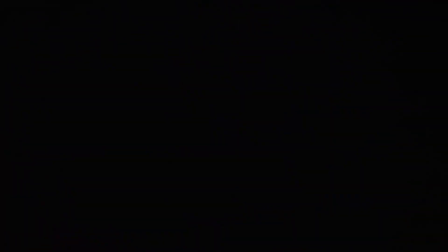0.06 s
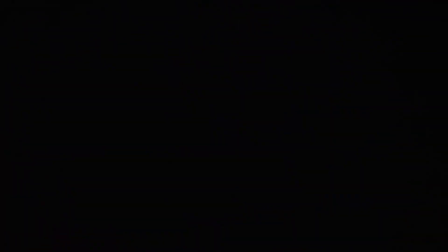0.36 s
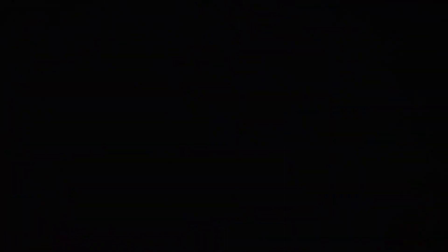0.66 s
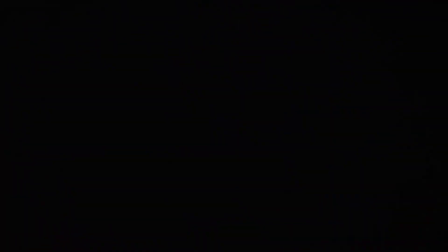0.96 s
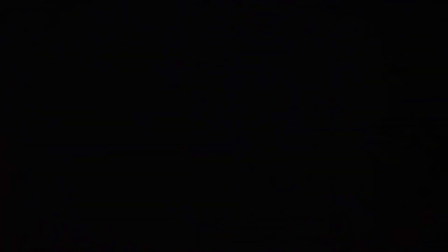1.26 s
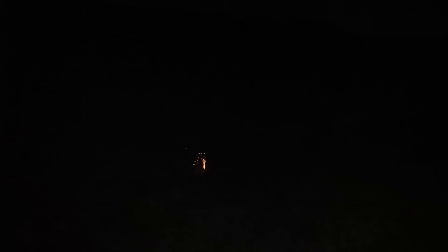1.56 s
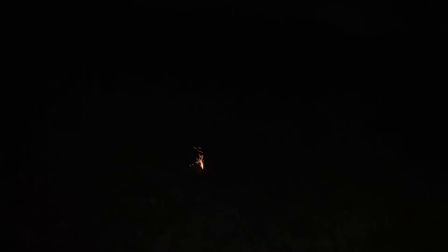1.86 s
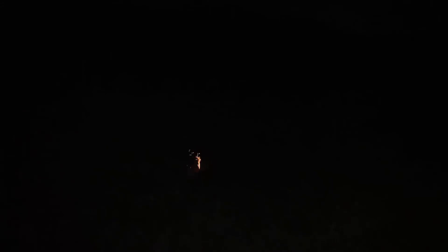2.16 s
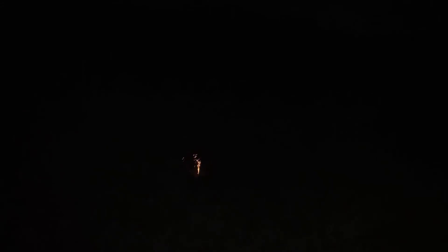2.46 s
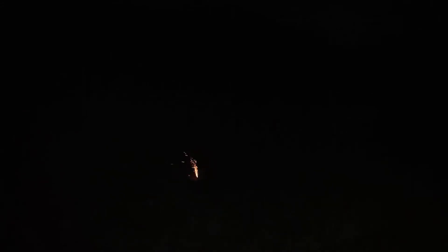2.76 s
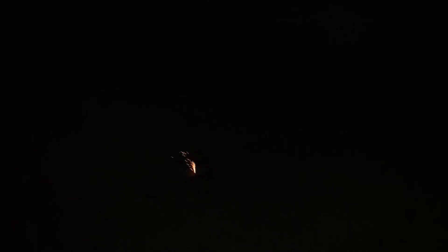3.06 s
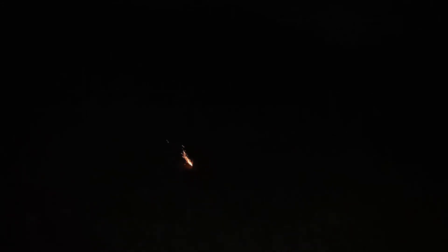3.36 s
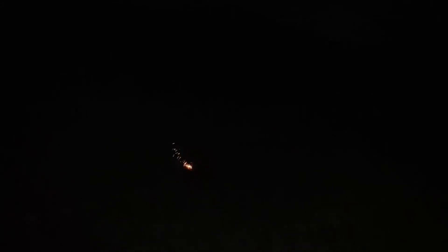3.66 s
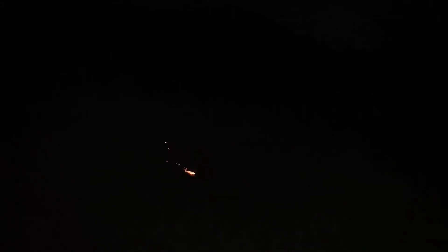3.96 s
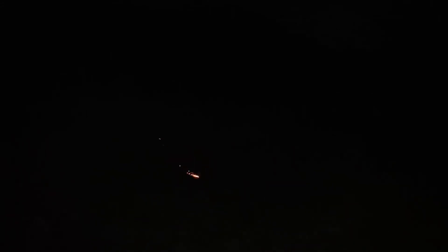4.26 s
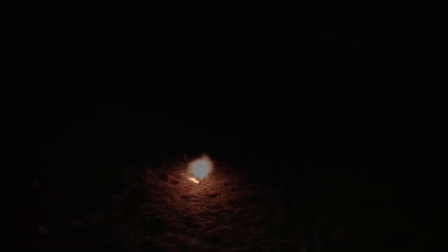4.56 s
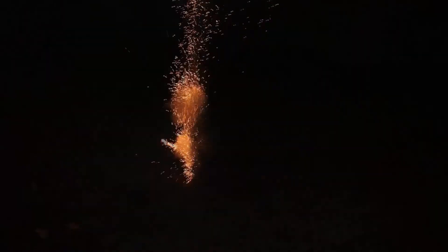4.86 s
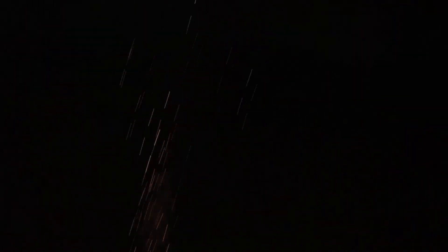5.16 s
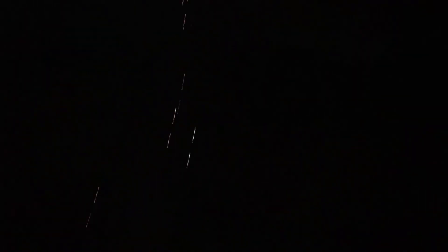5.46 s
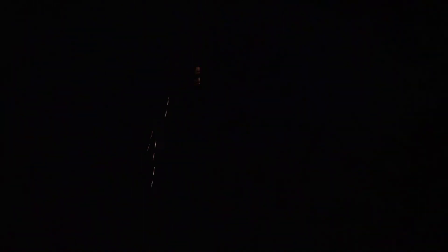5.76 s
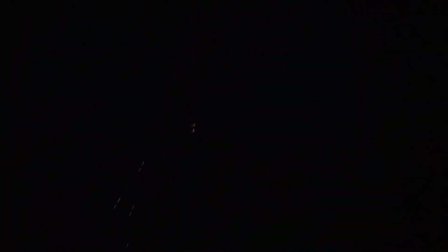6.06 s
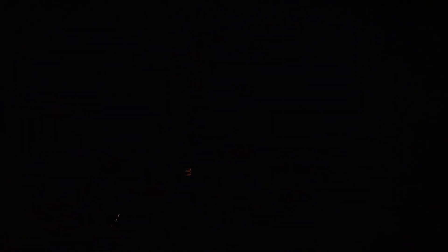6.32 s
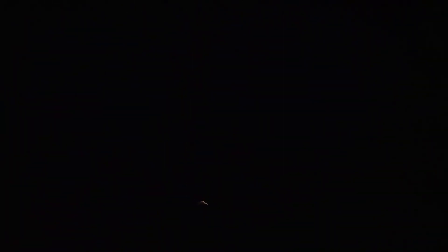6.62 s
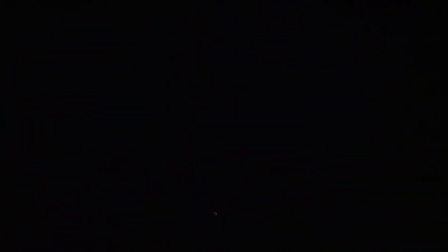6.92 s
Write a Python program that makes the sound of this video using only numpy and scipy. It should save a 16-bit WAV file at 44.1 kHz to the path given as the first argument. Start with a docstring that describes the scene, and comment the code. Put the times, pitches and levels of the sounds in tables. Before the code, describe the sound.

Outdoors at night, a distant volley of fireworks pops dully and fades to a faint crackle, with one sharp click nearby. After an abrupt cut, a close fuse hisses, sputters and snaps over faint traffic. The firework launches with a loud blast that briefly overloads the microphone. A jet of sparks rushes upward while the bang rolls back from the surroundings and dies away.

```python
"""A firework launches close by on a lawn at night. First a far-off volley crackles and dies away;
after a cut, the fuse hisses and spits. The lift charge overloads the microphone and the sound
drops out for an instant. Then a jet of sparks rushes from the tube and the bang rolls back
from trees and houses, over a murmur of distant traffic."""
import sys
import numpy as np
from scipy import signal
from scipy.fft import rfft, irfft, next_fast_len
from scipy.io import wavfile
from scipy.ndimage import map_coordinates

SR = 44100
rng = np.random.default_rng(int(sys.argv[2]) if len(sys.argv) > 2 else 0)


def output_pcm(signal):
    """Save a mono or channel-first signal as 16-bit PCM at the path in sys.argv[1].

    Samples are clipped to [-1, 1] before scaling.
    """
    pcm = np.clip(np.atleast_2d(signal).T, -1, 1) * 32767
    wavfile.write(sys.argv[1], SR, np.round(pcm).astype(np.int16))


N = 308259
T = np.arange(N) / SR
CUT_S, RESUME_S = 1.531, 1.5635  # gap between the far volley and the close firework
OVERLOAD_S, RECOVER_S = 4.5655, 4.629  # dropout after the blast


def amp(db):
    """Decibels to gain."""
    return 10 ** (np.asarray(db) / 20)


def unit(x):
    """Scale to rms 1."""
    return x / np.sqrt(np.mean(x ** 2) + 1e-20)


def along(points, hz):
    """Read (Hz, value) breakpoints on a log frequency axis."""
    freqs, values = np.transpose(points)
    return np.interp(np.log(hz + 1), np.log(freqs + 1), values)


def colour(points, hz):
    """Gain of an EQ curve that rolls off 24 dB an octave beyond its ends."""
    octaves_below = np.maximum(np.log2(points[0][0] / (hz + 1)), 0)
    octaves_above = np.maximum(np.log2((hz + 1) / points[-1][0]), 0)
    return amp(along(points, hz) - 24 * (octaves_below + octaves_above))


def since(s):
    """Seconds since time s, zero before it."""
    return np.maximum(T - s, 0)


def ramp(s, length_s):
    """Fade from 0 to 1, starting at time s."""
    return np.minimum(since(s) / length_s, 1)


def receding(s, doubling_s, loss_db_per_s):
    """Level in dB of a sound moving away from time s on: 1 / distance, and a steady loss."""
    return -20 * np.log10(1 + since(s) / doubling_s) - loss_db_per_s * since(s)


def swells(rows):
    """Bell-shaped swells and dips in dB, one curve for each level column."""
    return sum(np.outer(dbs, np.exp(-((T - s) / width) ** 2)) for s, width, *dbs in rows)


def wobble(rate):
    """Smooth random modulation, rate knots a second."""
    return map_coordinates(rng.standard_normal(int(N * rate / SR) + 4), [T * rate])


def filtered(x, response):
    """EQ x with a gain given as a function of frequency."""
    n_fft = next_fast_len(N + SR // 4, True)
    return irfft(rfft(x, n_fft) * response(np.fft.rfftfreq(n_fft, 1 / SR)), n_fft)[..., :N]


def sides(db):
    """Pan gains that put the left channel db above the right."""
    return amp(np.array([[.5], [-.5]]) * db)


def left_lag(hz, lag_ms):
    """Phase ramps that put the left channel lag_ms behind the right."""
    return np.exp(np.array([[-1j], [1j]]) * np.pi * hz * lag_ms / 1000)


def rush(spectrum, correlation, pan=((1000, 0),), grainy=0, rate=100, lag_ms=0):
    """Stereo noise of rms 1; the share grainy of its power comes as clicks, rate a second."""
    hits = np.flatnonzero(rng.random(N) < rate / SR)
    size = rng.choice([-1, 1], N)[hits] * rng.uniform(.5, 1, N)[hits]
    bearing = rng.uniform(-1, 1, N)[hits]
    grains = np.zeros((2, N))
    grains[:, hits] = size, np.sqrt(3) * size * bearing
    texture = np.sqrt(1 - grainy) * rng.standard_normal((2, N)) + np.sqrt(grainy) * unit(grains)
    n_fft = next_fast_len(N + SR // 4, True)
    hz = np.fft.rfftfreq(n_fft, 1 / SR)
    width = np.arccos(np.clip(along(correlation, hz), -1, 1)) / 2
    mid, side = rfft(texture, n_fft) * colour(spectrum, hz) * [np.cos(width), np.sin(width)]
    stereo = np.array([mid + side, mid - side]) * sides(along(pan, hz)) * left_lag(hz, lag_ms)
    return unit(irfft(stereo, n_fft)[:, :N])


def report(spectrum, scatter, t60, lag_ms=0, size=4096):
    """A stereo pressure pulse of peak 1 with a short scattered tail."""
    hz, t = np.fft.rfftfreq(size, 1 / SR), np.arange(size) / SR
    # minimum-phase EQ: the ringing follows the attack
    cepstrum = irfft(np.log(np.maximum(colour(spectrum, hz), 1e-5)))
    cepstrum[1:size // 2] *= 2
    cepstrum[size // 2 + 1:] = 0
    tail = rng.standard_normal((2, size)) * amp(-60 * t / t60)
    push = signal.unit_impulse(size, 16) + scatter * tail / np.linalg.norm(tail[0])
    pulse = irfft(rfft(push) * np.exp(rfft(cepstrum)) * left_lag(hz, lag_ms))
    return pulse / np.abs(pulse).max()


def add(track, s, sound):
    """Mix a sound in at time s."""
    part = track[:, max(round(s * SR), 0):][:, :sound.shape[-1]]
    part += sound[..., :part.shape[-1]]


# Pops that stand out of the volley: t/s, peak/dB
POP_CUES = [(.0167, -19), (.031, -14), (.0527, -10.5), (.0584, -15), (.0867, -12.5), (.1117, -16.5),
            (.1807, -14.5), (.2137, -15), (.2387, -16), (.2547, -14), (.3037, -12), (.3197, -19),
            (.3387, -23), (.3807, -16.5), (.4657, -18.5), (.5107, -20), (.5697, -16.5), (.6187, -24),
            (1.4027, -8.5), (1.4092, -23), (1.4417, -21), (1.4597, -20)]
# Tone of one pop, the crackle bed and the night air: f/Hz, level/dB
POP_EQ = [(150, -19), (280, -21.5), (400, -5), (560, 2.5), (820, -1), (1100, -14), (2000, -20.5),
          (3500, -32), (6000, -49)]
CRACKLE_EQ = [(88, -45), (150, -22), (456, -4), (540, -3.5), (807, 1.5), (1170, -6), (1800, -10),
              (3190, -19.5), (3660, -20.5), (6000, -32.5), (7800, -58)]
AIR_EQ = [(25, -15), (55, -5), (90, -0.5), (140, -7), (200, -4.5), (600, -8.5), (2000, -16), (5000, -20.5),
          (10000, -20.5), (15500, -26.5)]
# Stereo image of crackle and air: f/Hz, L-R correlation
FAR_IMAGE = [(60, 0.84), (700, 0.96), (2000, 0.87), (5000, 0.15), (10000, 0.086)]


def far_volley(start_db=-27, floor_db=-34.5, release_s=0.63):
    """Hundreds of small reports, dulled by distance, sag and then fade fast to a steady crackle."""
    level_db = np.maximum(start_db - 6 * T - 35 * since(release_s), floor_db)
    out = amp(level_db) * rush(CRACKLE_EQ, FAR_IMAGE, grainy=0.2, rate=300, lag_ms=0.14)
    for s, db in POP_CUES:
        add(out, s, amp(db) * report(POP_EQ, scatter=0.59, t60=0.063, lag_ms=0.12))
    return out + amp(-42.5) * rush(AIR_EQ, FAR_IMAGE)


# Bright, dry tone of the tick: f/Hz, level/dB
TICK_EQ = [(400, -5), (1400, 0), (2000, -5), (2550, -18), (3100, -7), (3800, -2), (4600, -19), (6500, -14),
           (7800, -7.5), (10000, -10), (11500, -15), (15500, -14)]


def tick(at_s=1.2572, peak_db=-3.5):
    """A small hard thing clicks once, close by."""
    out = np.zeros((2, N))
    add(out, at_s, amp(peak_db) * report(TICK_EQ, scatter=.45, t60=.008))
    return out


# Low murmur of the roads: f/Hz, level/dB
TRAFFIC_EQ = [(20, -3.5), (40, -0.5), (70, -4), (130, -3), (250, -1.5), (450, 2), (700, -2.5),
              (1100, -11.5), (2000, -17), (5000, -23), (8800, -23)]


def traffic(before_db=-37.5, after_db=-39.5):
    """A bed of distant traffic, a little quieter after the launch."""
    level_db = np.where(T < OVERLOAD_S, before_db, after_db) + 0.8 * wobble(6)
    image = [(40, 0.77), (200, 0.82), (500, 0.65), (1200, 0.2), (4000, .15)]
    return amp(level_db) * rush(TRAFFIC_EQ, image, pan=[(100, -1.2), (1000, -.5)])


# The powder flares or falters: t/s, half width/s, hiss/dB, whistle/dB
FUSE_SWELLS = [(1.73, 0.14, 1, 4), (1.95, 0.065, -3.5, -1.5), (3.2, 0.053, 4, 3), (3.35, 0.088, 3.5, 3)]
# Tone of the powder's hiss and the gas whistle: f/Hz, level/dB
FUSE_EQ = [(300, -7), (900, 3), (1700, 0), (2600, 1.5), (4100, 1), (5200, 3), (6400, -3.5), (7100, 1.5),
           (8200, -2.5), (8800, -12)]
WHISTLE_EQ = [(4400, -21), (4750, -7.5), (5100, -4), (5400, -1), (5850, -9), (6350, -2.5), (6900, -12.5),
              (8200, -25.5)]
# Stereo image of both: f/Hz, L-R correlation
FUSE_IMAGE = [(60, 0.75), (120, 0.67), (240, 0.75), (490, 0.56), (1000, 0.78), (2020, 0.82), (4070, 0.25),
              (8230, 1)]
# Notches where the ground bounce cancels the hiss: f/Hz, half width/Hz, left/dB, right/dB
GROUND_NOTCHES = [(2010, 100, 0.5, -7.5), (4640, 170, -8, -6), (4480, 150, 1.5, -12), (6320, 220, -3.5, -7)]
# Dulling once the flame is down: f/Hz, gain/dB
SUNK_EQ = [(1000, -1.5), (5500, -1), (8000, -5)]


def fuse(hiss_db=-37.5, whistle_db=-39.5, sink_at_s=3.03, notch_climb=1.06):
    """Burning powder fizzes and sputters; gas leaving the fuse's end adds a breathy whistle."""
    def ground(hz):
        return amp(sum(np.array([[left], [right]]) * np.exp(-((hz - f) / width) ** 2)
                       for f, width, left, right in GROUND_NOTCHES))

    hiss_swell_db, whistle_swell_db = swells(FUSE_SWELLS)
    sputter = amp(0.92 * wobble(45) + 0.6 * wobble(7.1))
    hiss_pan = [(1500, -3), (3200, -3.0), (4400, 0.5), (7000, 2.0)]
    hiss = rush(FUSE_EQ, FUSE_IMAGE, hiss_pan, grainy=0.2, rate=900, lag_ms=-0.018)
    whistle = rush(WHISTLE_EQ, FUSE_IMAGE, pan=[(5000, 9.4)], lag_ms=-0.013)
    burn = amp(hiss_db + hiss_swell_db) * hiss + amp(whistle_db + whistle_swell_db) * whistle
    # the flame sinks towards the ground: crossfade to a duller tone with higher notches
    sunk = ramp(sink_at_s, length_s=1)
    raised = filtered(burn, ground)
    lowered = filtered(burn, lambda hz: ground(hz / notch_climb) * amp(along(SUNK_EQ, hz)))
    return ((1 - sunk) * raised + sunk * lowered) * sputter * (T < OVERLOAD_S)


# Spitting sparks: t/s, crack/dB, puff/dB, crack tilt/(dB per octave), crack pan L-R/dB
SNAP_CUES = [(2.106, -19, -38, -6.5, 1), (2.96, -6.5, -24.5, 1.5, -12.5), (2.994, -19, -37.5, 0, -6),
             (3.033, -35.5, -25, -4, 1), (3.105, -37.5, -27, -4, -3), (4.2835, -15.5, -21, -1.5, -11)]
# Tone of the crack before its tilt: f/Hz, level/dB
CRACK_EQ = [(300, -8), (900, -6.5), (1450, -0.5), (2000, -10), (2600, -20), (3500, -15), (4300, -7.5),
            (4800, 0), (5300, -8), (5900, -16), (7000, -19), (8800, -33)]


def snaps(puff_delay_s=.0022):
    """Sparks go off with a sharp crack and a small, low puff."""
    out = np.zeros((2, N))
    puff_eq = [(120, -8.0), (240, 3.5), (700, -16.0)]
    for s, crack_db, puff_db, tilt, pan_db in SNAP_CUES:
        tilted_eq = [(hz, db + tilt * np.log2(hz / 1000)) for hz, db in CRACK_EQ]
        add(out, s, amp(crack_db) * sides(pan_db) * report(tilted_eq, scatter=0.56, t60=0.017))
        add(out, s + puff_delay_s, amp(puff_db) * report(puff_eq, scatter=0.53, t60=0.043))
    return out


# Pressure surges in the tube: t/s, level/dB
SURGE_CUES = [(4.532, -13.5), (4.542, -9), (4.5521, -1.5)]
# Broadband tone of the blast: f/Hz, level/dB
BLAST_EQ = [(60, -12), (280, -9.5), (560, -7.5), (1000, -2.5), (1750, -4.5), (2250, -9.5), (2650, -3),
            (3800, -12.5), (5000, -6.5), (6100, -5), (7200, -12), (8700, -22)]


def lift_charge(catch_at_s=4.452, catch_db=-33.5, attack_s=0.0036, decay_db_per_s=501):
    """The charge fizzes as it catches, then goes off in three fast, growing surges."""
    catch = amp(catch_db) * ramp(catch_at_s, length_s=.03)
    surges = sum(amp(db - decay_db_per_s * since(s)) * ramp(s, attack_s) for s, db in SURGE_CUES)
    image = [(200, 0.82), (1200, 0.91), (3000, 0.73), (8000, .6)]
    pan = [(700, -0.5), (1500, 2.5), (3000, -5), (4500, 2.5), (6000, 9.5), (8500, -3)]
    return (catch + surges) * rush(BLAST_EQ, image, pan) * (T < RECOVER_S)


# Spark clusters flare in flight: t/s, half width/s, hiss/dB, sizzle/dB
JET_SWELLS = [(4.95, 0.11, 4.5, 4), (5.23, 0.095, 3, 0.5), (5.48, 0.094, 3.1, 4), (5.95, 0.069, 0.5, 9.5),
              (6.3, 0.091, 3, -2)]
# Flight path: t/s, share of the hiss power heard from high on the right
JET_PATH = [(4.65, 0.091), (4.95, 0.98), (5.4, 0.55), (5.7, .05)]
# Tone of the jet's hiss and its fine top sizzle: f/Hz, level/dB
JET_EQ = [(700, -19), (1800, 0), (2700, -0.5), (3700, -2), (5200, -1.5), (6200, -7), (7200, -15),
          (8500, -31)]
SIZZLE_EQ = [(4500, -18), (5600, -1), (6400, -4), (7300, -7.5), (8000, -12), (8800, -14.5)]
# Tone shift as the sparks turn over and fall: f/Hz, gain/dB
FALLING_EQ = [(1500, -2.5), (2900, 2.5), (4500, -1.5), (6500, 1.5)]
# Pan of the jet: f/Hz, L-R/dB
JET_BALANCE = [(530, -7), (920, -6), (1600, 5), (2760, -2.5), (4760, 6), (8230, 2.5)]
# Wide image of the sparks overhead: f/Hz, L-R correlation
JET_IMAGE = [(1000, 0.28), (3000, 0.31), (8000, 0.46)]


def spark_jet(leaves_s=4.744, doubling_s=0.061, fall_at_s=5.5):
    """Burning grains stream from the tube, pass overhead and fall back; the sizzle fades first."""
    hiss_swell_db, sizzle_swell_db = swells(JET_SWELLS)
    hiss_db = -15 + receding(leaves_s, doubling_s, loss_db_per_s=-0.1) + hiss_swell_db
    sizzle_db = -18 + receding(leaves_s, doubling_s, loss_db_per_s=7.5) + sizzle_swell_db
    overhead = np.interp(T, *np.transpose(JET_PATH))
    ahead_image = [(1000, 1.0), (3000, 0.39), (8000, 0.25)]
    ahead = rush(JET_EQ, ahead_image, JET_BALANCE, grainy=0.11, rate=1400)
    above = rush(JET_EQ, JET_IMAGE, JET_BALANCE, grainy=0.29, rate=770, lag_ms=0.2)
    hiss = amp(hiss_db) * (np.sqrt(1 - overhead) * ahead + np.sqrt(overhead) * above)
    fallen = ramp(fall_at_s, length_s=.6)
    hiss = (1 - fallen) * hiss + filtered(fallen * hiss, lambda hz: amp(along(FALLING_EQ, hz)))
    sizzle = amp(sizzle_db) * rush(SIZZLE_EQ, JET_IMAGE, JET_BALANCE, grainy=0.092, rate=2300, lag_ms=.15)
    flutter = amp(0.59 * wobble(40))
    return (hiss + sizzle) * flutter * (T > OVERLOAD_S)


def roll_envelope(level_db, drift_db, doubling_s, loss_db_per_s, flutter_db, build_db_per_s=0):
    """Gain of one echo layer: it holds while near trees and houses answer, then recedes."""
    full_at_s, hold_s = 4.697, 0.5
    build_db = -build_db_per_s * np.maximum(full_at_s - T, 0)
    hold_db = drift_db * ramp(full_at_s, hold_s)
    release_db = receding(full_at_s + hold_s, doubling_s, loss_db_per_s)
    return amp(level_db + build_db + hold_db + release_db + flutter_db * wobble(30)) * (T > OVERLOAD_S)


# Waves and lulls in the echo: t/s, half width/s, thud/dB, boom/dB, clatter/dB
ROLL_SWELLS = [(4.745, .035, 4.5, 0.5, 1.5), (4.89, 0.054, -1, -2.5, -2.5), (5.28, 0.037, -3, 0, 0.5)]
# Bass, body and midrange layers of the roll: f/Hz, level/dB
THUD_EQ = [(55, -14.5), (85, -8.5), (110, 0), (140, -3.5)]
BOOM_EQ = [(60, -25), (110, -17), (150, -2.5), (190, 1), (300, 0), (400, -3), (570, -3.5), (700, -14)]
CLATTER_EQ = [(300, -20), (550, -3), (1000, -1), (1700, -1.5), (2300, -7.5), (3500, -12.5)]
# Stereo image of all three: f/Hz, L-R correlation
ROLL_IMAGE = [(60, 0.83), (140, 0.98), (310, 1), (700, 0.86), (1600, 0.67), (3500, 0.4)]
# Single hard slapbacks: t/s, peak/dB
SLAP_CUES = [(4.724, -7), (4.838, -10.5), (4.9617, -5), (4.9995, -6.5), (5.0503, -6.5), (5.1185, -7),
             (5.2086, -1.5), (5.3375, -9), (5.432, -12), (5.661, -21), (5.768, -23), (5.817, -23),
             (5.908, -20.5), (6.002, -26), (6.071, -27)]
# Dark tone of a slapback: f/Hz, level/dB
SLAP_EQ = [(60, -24), (130, -1.5), (300, 1), (600, -11), (1600, -18), (4000, -23.5), (8000, -41)]


def rolling_echo():
    """Countless reflections of the bang merge into a roll; broad walls send back single slaps."""
    thud_db, boom_db, clatter_db = swells(ROLL_SWELLS)
    thud = roll_envelope(thud_db - 32, drift_db=-4.5, doubling_s=0.13, loss_db_per_s=14,
                         flutter_db=0.5, build_db_per_s=220)
    boom = roll_envelope(boom_db - 22, drift_db=2, doubling_s=0.15, loss_db_per_s=4.5,
                         flutter_db=1.16, build_db_per_s=128)
    clatter = roll_envelope(clatter_db - 19.5, drift_db=-1.15, doubling_s=0.16, loss_db_per_s=10.5,
                            flutter_db=1.2)
    boom_pan = [(100, -1), (400, -1.3)]
    clatter_pan = [(500, -2.5), (1100, -4.0), (2200, -7.5)]
    out = thud * rush(THUD_EQ, ROLL_IMAGE)
    out += boom * rush(BOOM_EQ, ROLL_IMAGE, boom_pan, grainy=0.3, rate=220, lag_ms=0.29)
    out += clatter * rush(CLATTER_EQ, ROLL_IMAGE, clatter_pan, grainy=0.37, rate=400, lag_ms=0.18)
    for s, db in SLAP_CUES:
        add(out, s, amp(db) * report(SLAP_EQ, scatter=0.85, t60=0.075, lag_ms=.2))
    return out


def squeak(at_s=5.757, peak_db=-35, start_hz=1650, end_hz=2550):
    """A short, rough upward glide among the falling sparks."""
    glide = ramp(at_s, length_s=0.031)
    hz = start_hz + (end_hz - start_hz) * glide + 120 * wobble(700)
    return amp(peak_db) * np.sin(np.pi * glide) * np.sin(2 * np.pi * np.cumsum(hz) / SR)


def scene():
    """The far volley, a hard cut, then the firework close by."""
    near = traffic() + fuse() + snaps() + lift_charge() + spark_jet() + rolling_echo() + squeak()
    far = far_volley() + tick()
    return far * (T < CUT_S) + near * (T > RESUME_S)


def record(dry, ceiling=.92, near_top_hz=8950, top_hz=15850):
    """The blast clips the microphone, which briefly drops out; the close scene has less top end."""
    def low_pass(x, cutoff_hz):
        return filtered(x, lambda hz: np.clip((cutoff_hz - hz) / 200 + .5, 0, 1))

    collapse = amp(-12 - 1700 * since(OVERLOAD_S))
    recovery = ramp(RECOVER_S, length_s=.011) ** 2
    dropout = np.where(T < OVERLOAD_S, 1, collapse + recovery)
    near = low_pass(np.clip(dry * dropout, -ceiling, ceiling), near_top_hz)
    return low_pass(np.where(T < CUT_S, dry, np.clip(near, -1, 1)), top_hz)


dry = scene()
out = record(dry)
output_pcm(out)
```